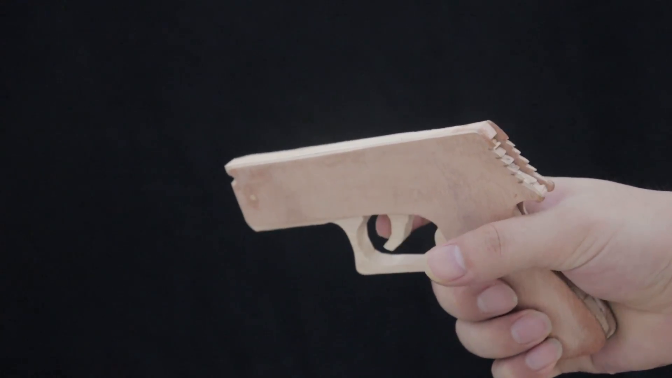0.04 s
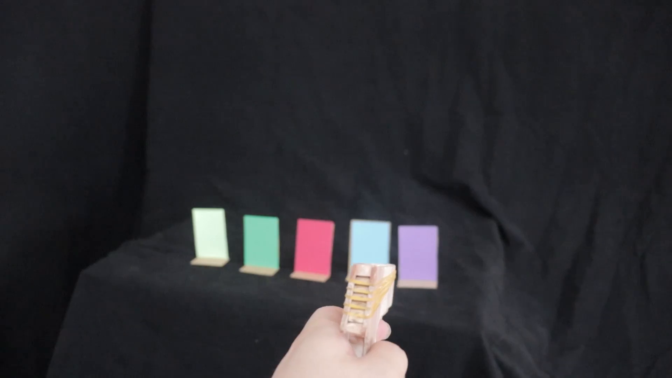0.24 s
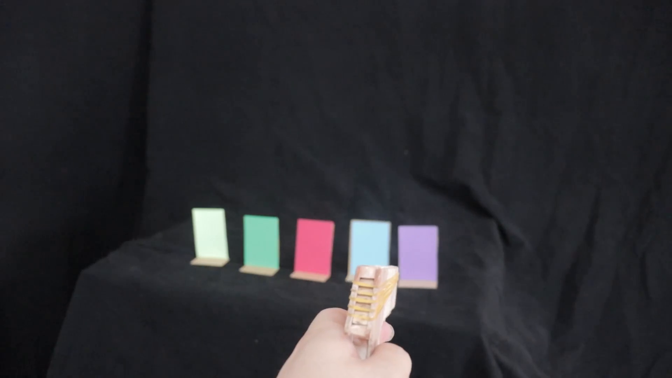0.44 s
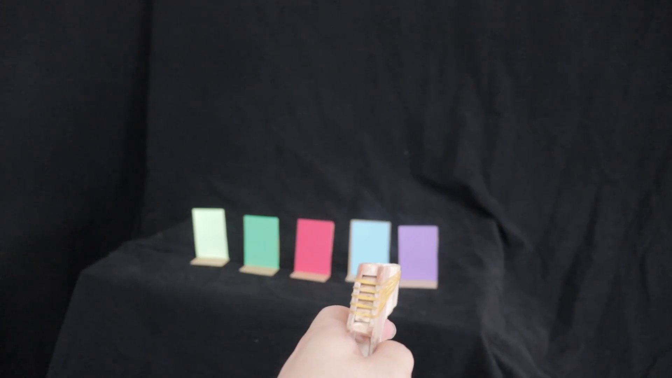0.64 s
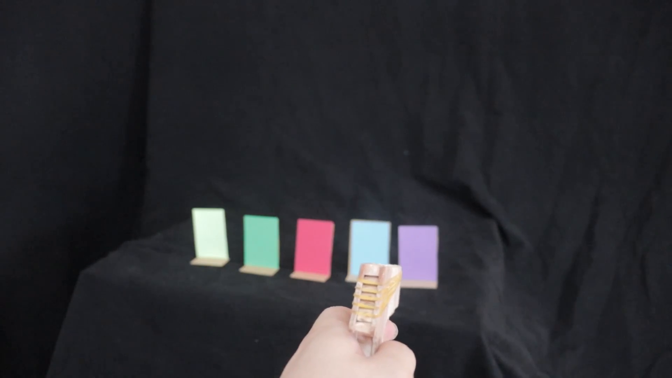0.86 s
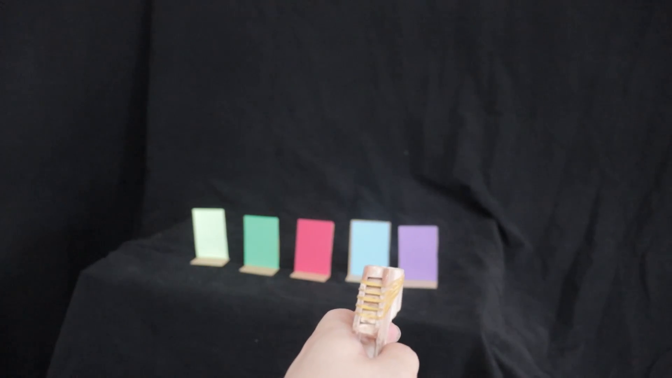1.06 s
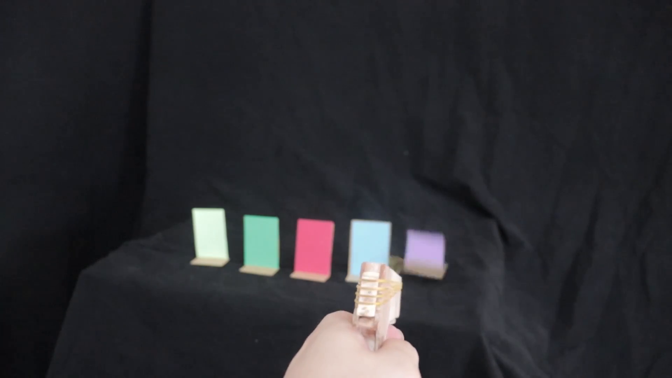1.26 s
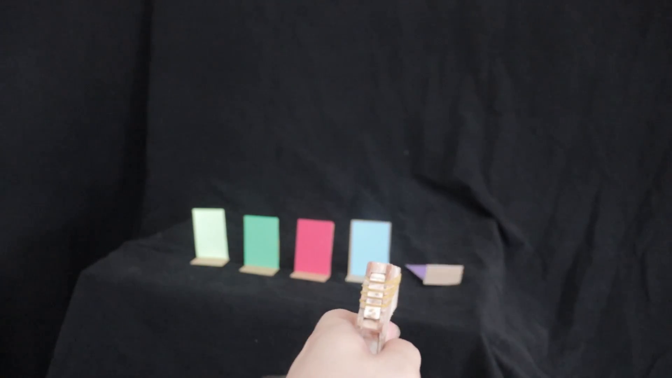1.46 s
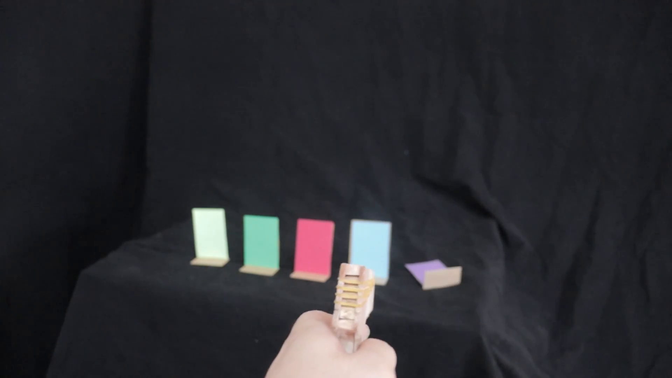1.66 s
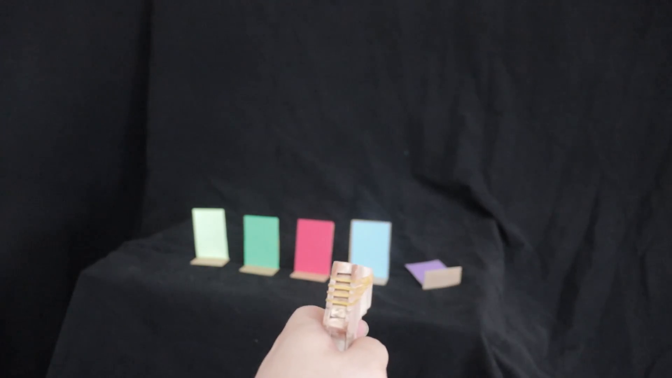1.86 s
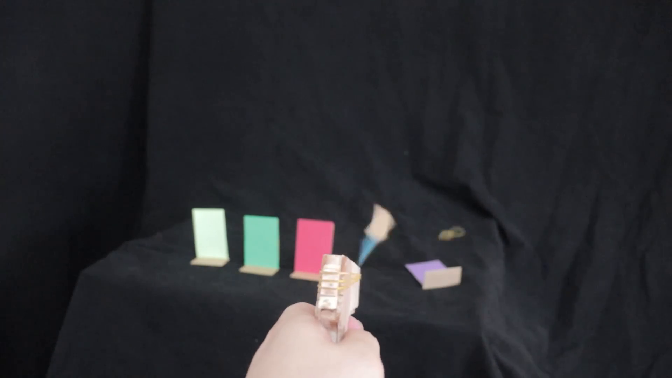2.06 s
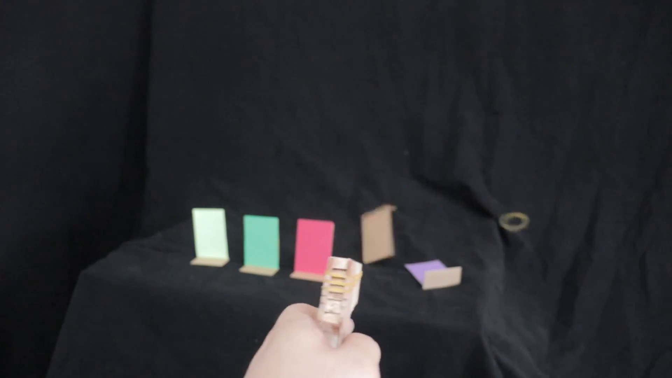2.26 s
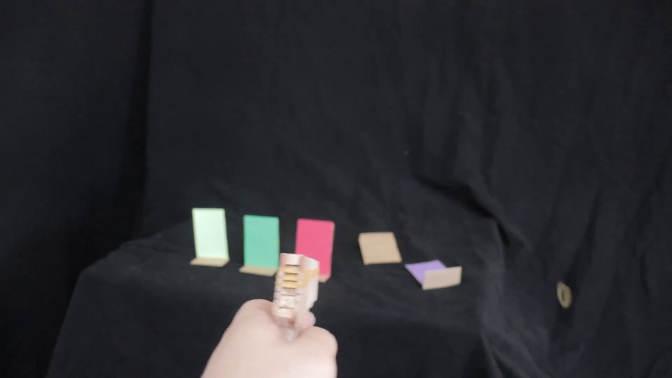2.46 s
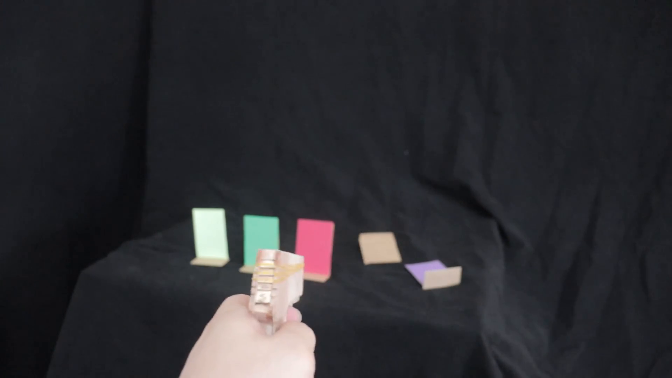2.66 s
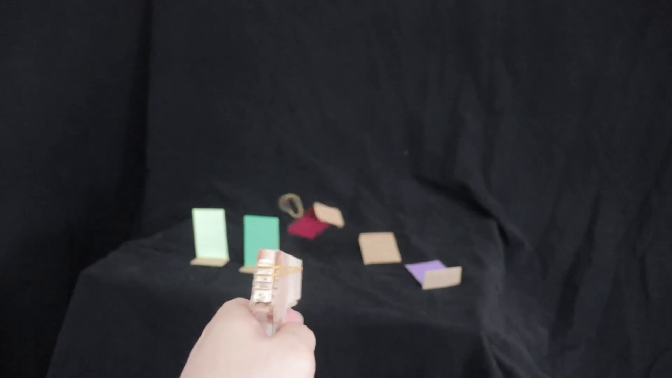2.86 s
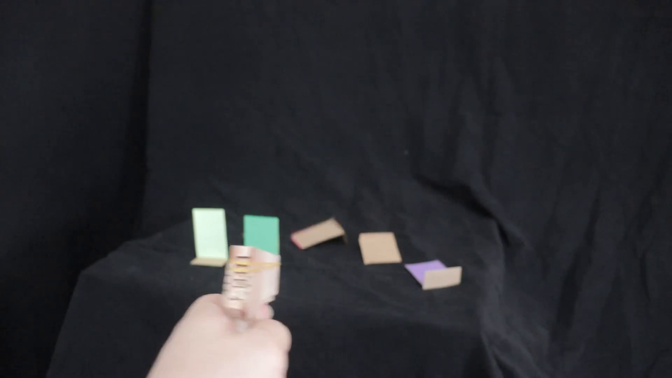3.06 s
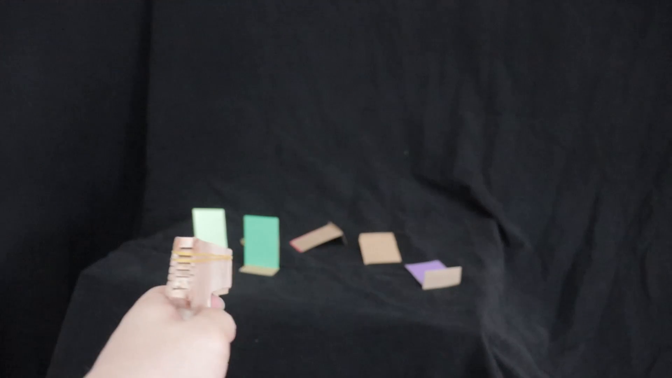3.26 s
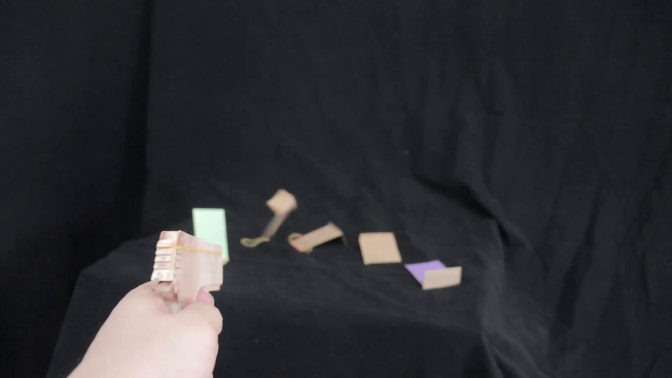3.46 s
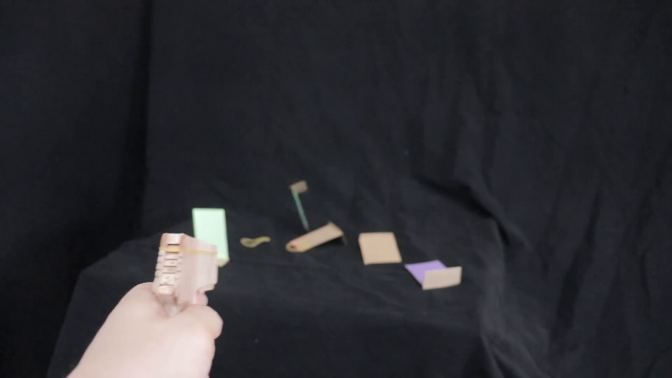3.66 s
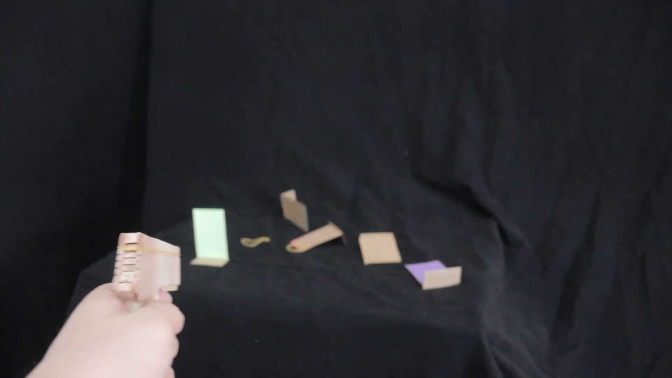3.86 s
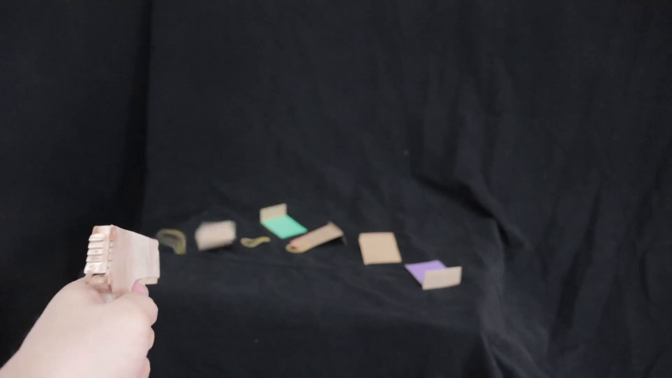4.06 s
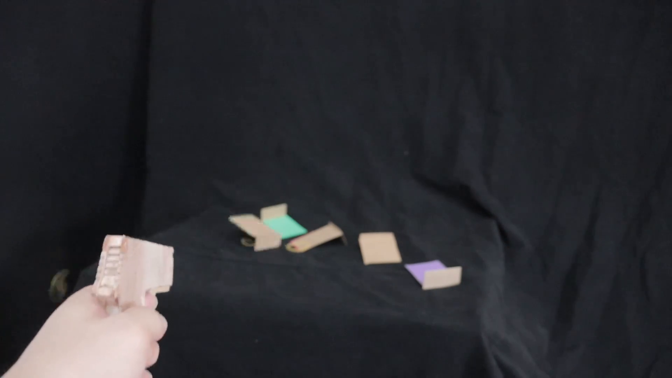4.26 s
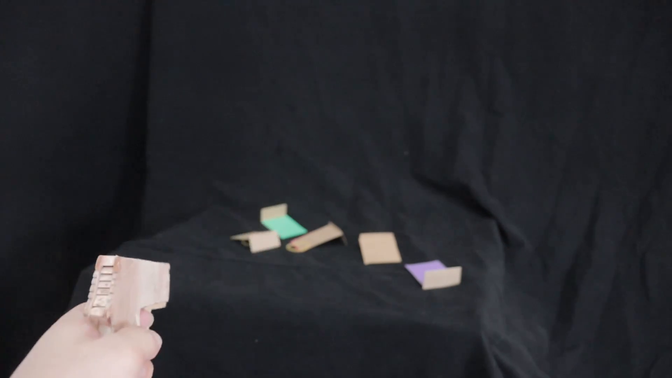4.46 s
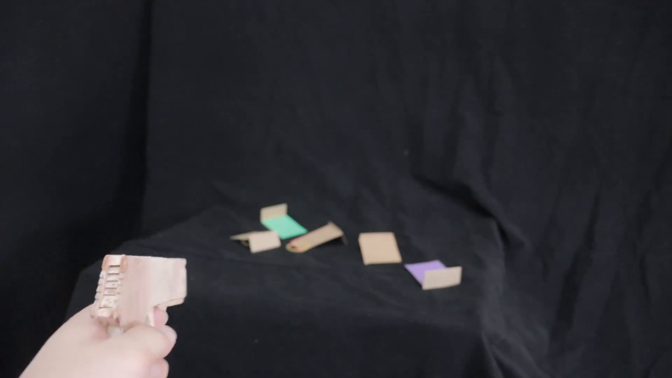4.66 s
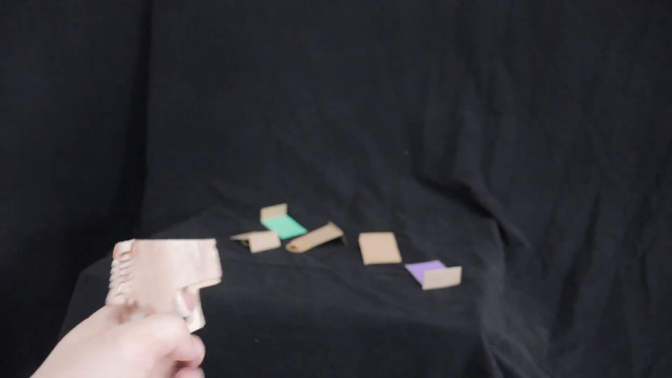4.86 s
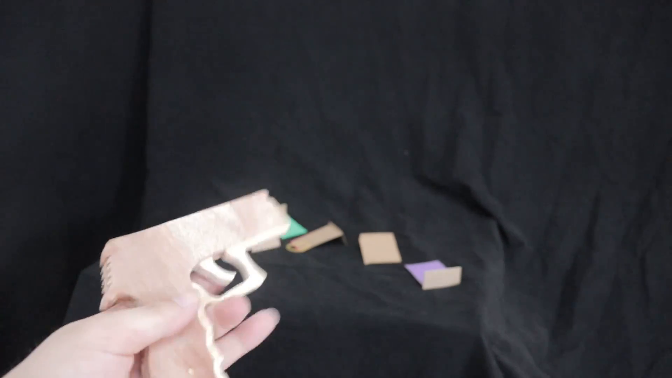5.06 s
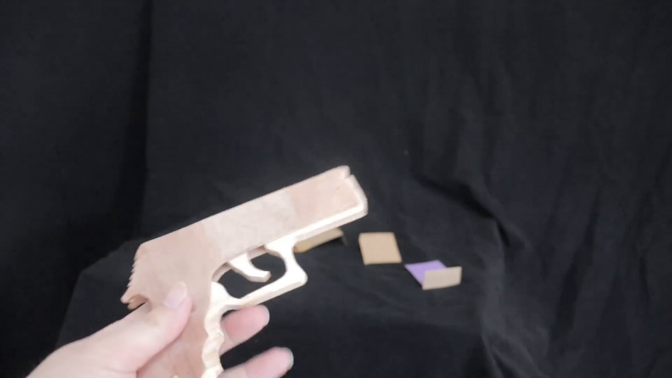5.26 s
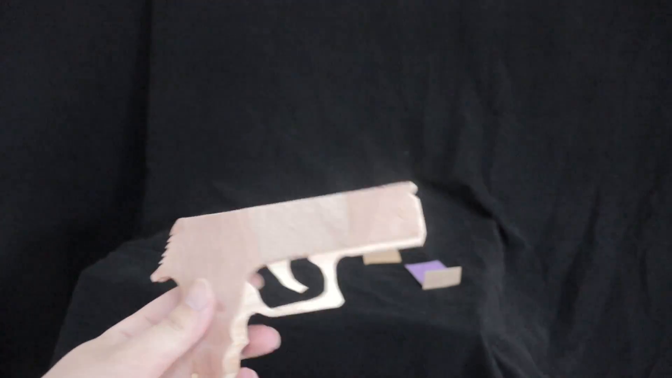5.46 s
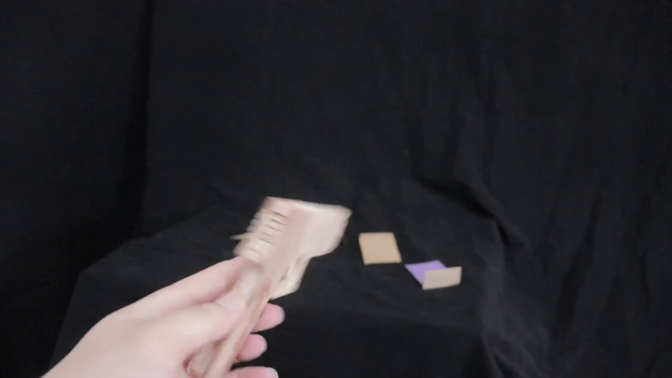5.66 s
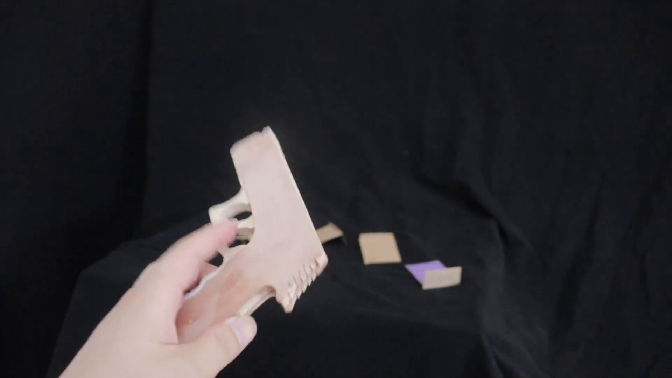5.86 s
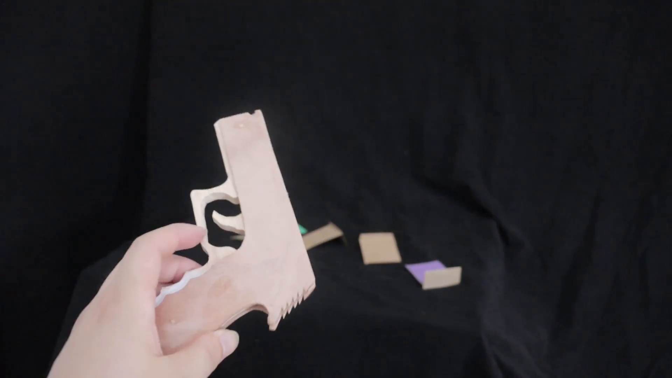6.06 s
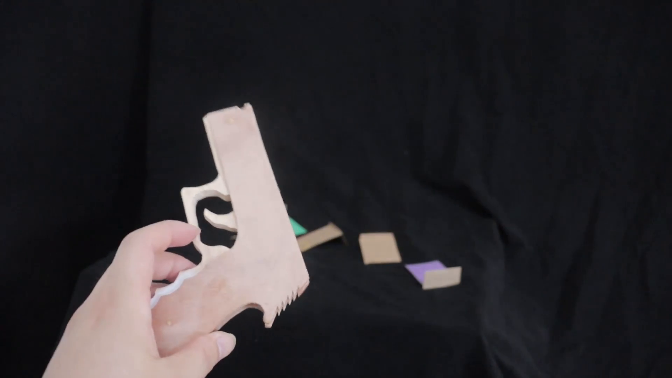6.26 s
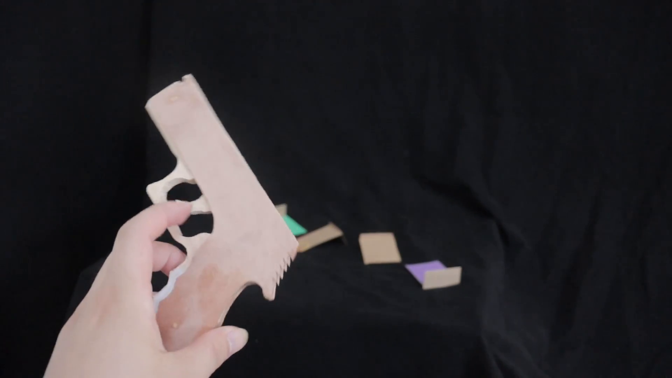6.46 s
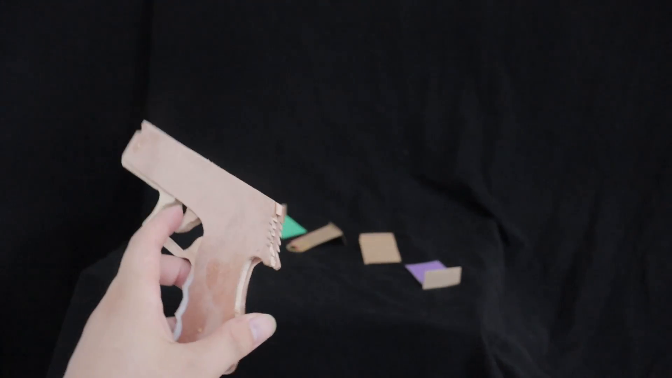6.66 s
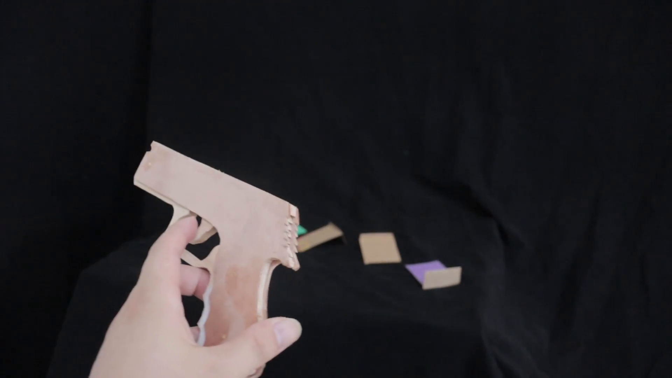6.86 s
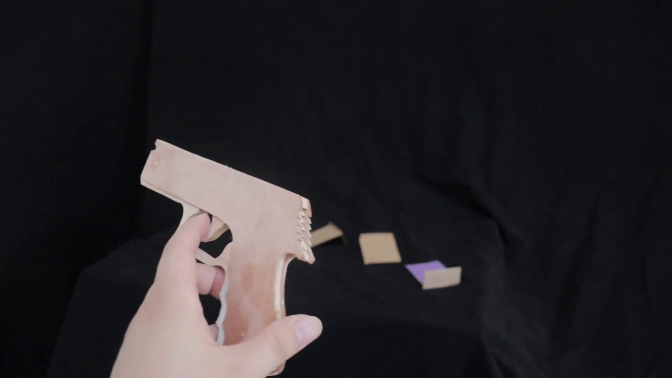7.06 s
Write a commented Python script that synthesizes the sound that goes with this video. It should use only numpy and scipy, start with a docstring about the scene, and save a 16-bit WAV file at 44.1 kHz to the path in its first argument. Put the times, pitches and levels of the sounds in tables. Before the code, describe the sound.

Close up in a fairly live room, a wooden trigger clacks once and its ring stops abruptly. After a quiet pause, five sharp rubber band cracks follow, each preceded by a tiny rising creak and tick, most with trigger clacks between. Cards tumble with dull thuds on a draped table farther off. Then soft rubs, finger taps and faint squeaks. The near stereo microphone overloads slightly on the cracks.

```python
"""A wooden rubber band pistol is fired five times at card targets in a fairly live room.
Sticking slips make the trigger creak; sharp pushes through resonances make the band crack and trigger clacks.
Cards tumble on a draped table as softened bounces; then the gun is turned in the hand: rubs, taps, squeaks.
Shaped noise and wavering tones make rumble, hiss and a fan. The cracks overload the near microphone,
whose gain ducks and recovers."""
import sys
import numpy as np
from scipy import signal
from scipy.fft import rfft, irfft
from scipy.io import wavfile
from scipy.ndimage import uniform_filter1d

SR = 44100
rng = np.random.default_rng(int(sys.argv[2]) if len(sys.argv) > 2 else 0)


def inscribe(sig):
    """Save sig as 16-bit PCM at rate SR to the path in sys.argv[1].

    A 1-D sig is mono; a 2-D sig holds one channel per row.
    Samples are clipped to [-1, 1] before scaling.
    """
    pcm = np.round(np.clip(np.atleast_2d(sig).T, -1, 1) * 32767)
    wavfile.write(sys.argv[1], SR, pcm.astype(np.int16))


N = 313536
T = np.arange(N) / SR
HIT = np.arange(2048) / SR   # time axis of one short hit


def from_db(db):
    """Decibels to gain."""
    return 10 ** (np.asarray(db) / 20)


def rms_one(x):
    """Scale to rms 1."""
    return x / np.sqrt(np.mean(x ** 2) + 1e-20)


def unit_energy(x):
    """Scale to energy 1."""
    return x / np.sqrt(np.sum(x ** 2, axis=-1, keepdims=True) + 1e-20)


def at_hz(points, hz):
    """Read a spectrum on a log-frequency axis."""
    f, value = np.transpose(points)
    return np.interp(np.log(hz + 1e-9), np.log(f), value)


def add(track, s, sound):
    """Mix a sound in from time s."""
    start = max(round(s * SR), 0)
    part = track[..., start:start + sound.shape[-1]]
    part += sound[..., :part.shape[-1]]


def cut(x, hz, kind, order=2):
    """Butterworth low- or high-pass."""
    return signal.sosfilt(signal.butter(order, hz, kind, fs=SR, output="sos"), x)


def tone(x, bass_db, treble_db, bass_hz=900, treble_hz=4500):
    """Bass shelf, then treble shelf."""
    x = x + (from_db(bass_db) - 1) * cut(x, bass_hz, "low", order=1)
    return x + (from_db(treble_db) - 1) * cut(x, treble_hz, "high", order=1)


def body(force, modes):
    """Wood or table rings as parallel two-pole resonances of alternating sign."""
    out = 0
    for k, (hz, width_hz, db) in enumerate(modes):
        r = np.exp(-np.pi * width_hz / SR)
        poles = [1, -2 * r * np.cos(2 * np.pi * hz / SR), r * r]
        ring = (1 - r * r) / 2 * signal.lfilter([1, 0, -1], poles, force)
        out = out + (-1) ** k * from_db(db) * ring
    return out


def notch(x, gaps):
    """Antiresonances: dips in series; rows are (f/Hz, width/Hz, level/dB)."""
    for hz, width_hz, db in gaps:
        x = x + (from_db(db) - 1) * body(x, [(hz, width_hz, 0)])
    return x


def contact(bounce, gap_s):
    """A sharp push, then ever weaker rebounds of the touching faces."""
    force = signal.unit_impulse(len(HIT))
    for gap in gap_s * np.array([.41, 1]) * rng.uniform(.85, 1.15, 2):
        loop = np.r_[1, np.zeros(int(gap * SR)), bounce]
        force = signal.lfilter(loop[::-1], loop, force)   # all-pass: spreads the push without colouring it
    return force


def at_level(hit, db):
    """A hit's level is that of its energy spread over 2 ms."""
    return from_db(db) * unit_energy(hit) * np.sqrt(.002 * SR)


# how alike left and right are in diffuse sound: f/Hz, correlation (0-1)
LEFT_RIGHT_LIKENESS = [(60, 0.98), (330, 0.93), (700, 0.67), (1400, 0.23), (2800, 0.052), (8000, 0.027)]


def diffuse(colour, size):
    """Stereo noise from all around: alike in the bass, nearly unrelated in the treble."""
    hz = np.fft.rfftfreq(size, 1 / SR)
    alike = np.clip(at_hz(LEFT_RIGHT_LIKENESS, hz), 0, 1)
    mid, side = rfft(rng.standard_normal((2, size)))
    stereo = np.sqrt(1 + alike) * mid + np.sqrt(1 - alike) * side * [[1], [-1]]
    return irfft(from_db(at_hz(colour, hz)) * stereo, size)


# spectrum shape of room rumble and hiss: f/Hz, relative level/dB
AIR_COLOUR = [(15, -57), (25, -20), (35, -25), (49, -8.5), (70, -1.5), (87, -13), (157, -6), (405, -11.5),
              (439, -15), (575, -15), (1480, -21), (1610, -23.5), (1740, -23.5), (2990, -29),
              (16000, -42.5)]
# tones of a fan: f/Hz, rms level/dB
FAN_HUM = [(57.5, -57), (166.9, -62), (441.4, -59.5), (500.6, -61.5), (1620, -69.5), (2945, -76)]


def background(air_db=-50, waver_hz=5.8):
    """Rumble and hiss from shaped noise, with fan tones whose pitch wavers at random."""
    out = from_db(air_db) * rms_one(diffuse(AIR_COLOUR, size=N))
    knots = np.arange(0, T[-1] + 1, 1 / 16)
    for hz, db in FAN_HUM:
        pitch = hz + waver_hz * np.interp(T, knots, rng.standard_normal(len(knots)))
        hum = np.sin(2 * np.pi * np.cumsum(pitch) / SR)
        out = out + from_db(db) * np.sqrt(2) * hum
    return out


# resonances of rubbed wood: f/Hz, width/Hz, level/dB
WOOD_GRAIN = [(1342, 620, -2.5), (2430, 840, 2), (3298, 706, 2), (4290, 1500, -5), (6260, 1016, -2),
              (9330, 6300, -6), (14600, 4800, -7.5)]


def rubbing(rows):
    """Grainy strokes that swell and fade; rows are (middle t/s, half length/s, level/dB, treble/dB)."""
    out = np.zeros(N)
    t = np.arange(-SR // 5, SR // 5) / SR
    for s, half_s, db, treble_db in rows:
        roughness = from_db(1.7 * rng.standard_normal(len(t)))
        grains = rng.standard_normal(len(t)) * roughness
        wood = rms_one(tone(body(grains, WOOD_GRAIN), 0, treble_db))
        rub = from_db(db) * wood * np.exp(-(t / half_s) ** 2)
        add(out, s + t[0], rub[t >= -s])   # drop what falls before time zero
    return out


# the hand shifts its grip on the wood: middle t/s, half length/s, level/dB, treble/dB
GRIP_RUBS = [(0.013, 0.033, -39, -6), (5.05, 0.09, -59.5, 1), (5.2, 0.021, -58, 10),
             (5.355, 0.079, -58.5, -7), (5.625, 0.041, -59.5, -8), (5.72, 0.029, -49, -10)]


def grip_rubs():
    """Skin drags across the grain as the grip shifts."""
    return rubbing(GRIP_RUBS)


def blows(rows, modes, gaps, ring_width_hz, bounce, gap_s):
    """Hard blows ring the gun; returns the direct sound and what is sent into the room."""
    out = np.zeros((2, N))
    for s, db, ring_hz, ring_db, damped_hz, damped_db, bass_db, treble_db, room_db in rows:
        wood = body(contact(bounce, gap_s), modes)
        wood = wood + body(wood, [(ring_hz, ring_width_hz, ring_db)])   # the place of the blow favours one region
        wood = notch(wood, list(gaps) + [(damped_hz, 800, damped_db)])   # the grip deadens another
        hit = at_level(tone(wood, bass_db, treble_db), db)
        add(out, s, hit * from_db([[0], [room_db]]))
    return out


# trigger and catch knock on the frame: t/s, level/dB, local ring f/Hz, ring level/dB,
# damped region f/Hz, damping/dB, bass/dB, treble/dB, room send/dB
TRIGGER_CLACKS = [(.0378, -15.5, 2160, -5, 4380, -3.5, 10.5, -0.5, -1.5),
                  (1.6186, -8.5, 4564, 0, 3840, -8.5, 6, 3, 0),
                  (2.3583, -5.5, 6500, -2.5, 5780, -5, -6, 7, -0.5),
                  (3.0285, -18, 2210, 4, 4200, -1, -14, -1.5, 2),
                  (3.6935, -15.5, 1850, -9, 3700, -1, -0.5, -3, 1.5),
                  (4.1235, -18, 2690, 3, 4710, -3.5, 5, -3.5, 2.5),
                  (4.3235, -22.5, 2220, 5.5, 4780, 0, 5, -1, 6)]
# resonances of the trigger parts: f/Hz, width/Hz, level/dB
TRIGGER_MODES = [(1705, 230, -1), (2076, 220, -1), (2610, 260, -1), (3151, 180, 3.5), (4040, 300, -6),
                 (4770, 320, -2.5), (6390, 450, -10), (7770, 770, -14), (9250, 700, -10.5),
                 (10700, 840, -13), (15000, 1100, -17.5)]


def trigger_clacks():
    """Trigger and catch strike the frame and set the small parts ringing."""
    return blows(TRIGGER_CLACKS, TRIGGER_MODES, [], ring_width_hz=450, bounce=0.72, gap_s=0.00049)


# decay of the room: f/Hz, time to fall 60 dB/s
ROOM_DECAY = [(100, 1), (230, 1.07), (500, .65), (1000, 0.7), (2500, 0.66), (5000, 0.65), (9000, 0.52),
              (16000, 0.6)]
# colour of echoes and tail: f/Hz, relative level/dB
TAIL_COLOUR = [(60, 1.5), (130, 2), (200, 4), (400, 1), (800, 2), (1500, -2), (3000, -2.5), (6000, 1.5),
               (10000, -3.5), (16000, -6.5)]
# low standing waves: f/Hz, time to fall 60 dB/s, level/dB
STANDING_WAVES = [(169, 1.5, -54), (193.8, 0.97, -51), (224.7, 1.4, -49.5), (242.2, 1.55, -54.5),
                  (336, 0.69, -56.5)]
# echoes off near surfaces: delay t/s, level/dB
NEAR_ECHOES = [(.0028, -10.5), (0.013, -12), (0.0172, -14.5), (0.022, -14.5)]


def room_response(tail_db=-1.0, build_s=0.0043, scatter_s=0.00071):
    """Smeared early echoes, a diffuse tail dying band by band, and low standing waves."""
    t = T[:65536]
    hz = np.fft.rfftfreq(len(t), 1 / SR)
    noise = rfft(diffuse(TAIL_COLOUR, size=len(t)))
    centres = np.array(ROOM_DECAY)[:, 0]
    out = np.zeros((2, len(t)))
    for share, (_, t60) in zip(np.eye(len(centres)), ROOM_DECAY):
        band = irfft(noise * at_hz(np.c_[centres, share], hz))
        even_energy = np.sqrt(np.log(1000) / (t60 * SR))   # long decays start lower
        out += band * from_db(-60 * t / t60) * even_energy
    out *= from_db(tail_db) * (1 - np.exp(-(t / build_s) ** 2))
    for delay_s, db in NEAR_ECHOES:
        smear = diffuse(TAIL_COLOUR, size=len(HIT)) * np.exp(-HIT / scatter_s)
        add(out, delay_s, from_db(db) * unit_energy(smear))
    for mode_hz, t60, db in STANDING_WAVES:
        wave = np.sin(2 * np.pi * (mode_hz * t + rng.random()))
        out += from_db(db) * wave * np.exp(-np.log(1000) * t / t60)
    return out


def near_field(x, side_db, spread_s):
    """Hand and microphone body scatter sound differently into each side; the left is reached first."""
    burst = rng.standard_normal(len(HIT)) * np.exp(-HIT / spread_s)
    scatter = from_db(side_db) * unit_energy(cut(burst, 900, "high", order=1))
    side = signal.oaconvolve(x, scatter)[:N]
    return np.array([x + side, np.roll(x - side, 1)])   # right is one sample late


# fingers tap the frame: t/s, level/dB, local ring f/Hz, ring level/dB, bass/dB, treble/dB
FINGER_TAPS = [(1.189, -44, 3200, 8, -10, 3), (5.064, -48, 1080, 14, 11, -7), (5.087, -43, 1220, 9, 2, 12),
               (5.2468, -34.5, 820, 12.5, 3.5, 8.5), (5.901, -50.5, 2140, 13, -6, -13)]
# resonances of the frame, for taps and cracks: f/Hz, width/Hz, level/dB
FRAME_MODES = [(91.8, 50, -16.5), (340, 284, -12), (810, 130, -5), (1233, 220, -2), (1628, 174, 1.5),
               (1874, 140, 1), (2198, 290, -0.5), (2847, 257.2, 0), (3264, 267, -2), (3780, 670, -4.5),
               (5375, 770, -9), (6680, 1520, -11), (8800, 3500, -13.5), (14120, 4300, -17)]


def taps(ring_width_hz=230):
    """Light touches of the fingers ring the frame."""
    out = np.zeros(N)
    for s, db, ring_hz, ring_db, bass_db, treble_db in FINGER_TAPS:
        wood = body(contact(bounce=0.77, gap_s=0.00025), FRAME_MODES)
        wood = wood + body(wood, [(ring_hz, ring_width_hz, ring_db)])
        add(out, s, at_level(tone(wood, bass_db, treble_db), db))
    return out


def slip(db, treble_db):
    """One slip of wood on wood, catching another spot of the wood with a ring of its own."""
    wood = body(contact(bounce=0.85, gap_s=.0002), WOOD_GRAIN)
    ring_hz = 3405 * np.exp(0.4 * rng.standard_normal())
    wood = wood + body(wood, [(ring_hz, 500, 2)])
    return at_level(tone(wood, 0, treble_db), db)


def slip_run(length_s, db, treble_db, end_lead_s=.0155, rise_db_per_s=219, count=16):
    """Stick-slip grows with the force until just before the shot: pairs (lead before it/s, sound)."""
    gaps = 0.0054 * np.exp(.35 * rng.standard_normal(count))   # uneven, around 5.4 ms
    leads = length_s - (np.cumsum(gaps) - gaps[0])
    levels = db + 3 * rng.standard_normal(count) - rise_db_per_s * (leads - end_lead_s)
    levels[0] += 2.5   # the breakaway slip is stronger
    slips = [slip(level_db, treble_db) for level_db in levels]
    return [(lead_s, sound) for lead_s, sound in zip(leads, slips) if lead_s > end_lead_s]


# the pull before each shot: take-up lead/s, take-up level/dB, creak start lead/s, creak level/dB,
# creak treble/dB, catch level/dB, band slide level/dB
TRIGGER_PULLS = [(.1, -48.5, .0665, -28, 1, -20.5, -28.5), (0.068, -45, 0.034, -28, 1, -19.5, -37.5),
                 (0.053, -47.5, 0.024, -26.5, -1, -33, -29.5), (.064, -48, .03, -30.5, -1, -24.5, -37.5),
                 (0.056, -46.5, .0245, -30.5, 5, -21.5, -26)]


def trigger_pulls():
    """The finger takes up slack, the trigger sticks and slips, the catch snaps free, the band slides off."""
    out = np.zeros(N)
    for (s, *_), pull in zip(BAND_SHOTS, TRIGGER_PULLS):
        take_up_s, take_up_db, creak_s, creak_db, treble_db, catch_db, slide_db = pull
        for lead_s, sound in slip_run(creak_s, creak_db, treble_db):
            add(out, s - lead_s, sound)
        add(out, s - 0.023, slip(catch_db, treble_db=6.5))   # bright tick
        take_up = (s - take_up_s, .018, take_up_db, -4)   # soft rub
        slide = (s - .008, 0.0095, slide_db, -12)   # dull rub off the tooth
        out += rubbing([take_up, slide])
    return out


# the band lets go: t/s, level/dB, ring of this stretch f/Hz, ring level/dB,
# damped region f/Hz, damping/dB, bass/dB, treble/dB, room send/dB
BAND_SHOTS = [(1.3270, 0.5, 4076, -1.5, 2858, -8.5, 5, 5, -1),
              (2.0962, -2, 1170, -6.5, 4600, -3, 1.5, -2, 0),
              (2.8267, -1, 2900, -5.5, 1100, -1.5, 2.5, 0, 0.5),
              (3.4778, -3, 2570, -4.5, 2080, -5.5, 0, 2.5, 0),
              (4.1261, 2, 2700, -5.5, 1450, -1.5, -5.5, -4.5, 0.5)]
# antiresonances between the frame modes: f/Hz, width/Hz, level/dB
FRAME_DIPS = [(173, 70, -3.5), (584, 81, -2.5), (928, 200, -3), (1520, 140, -4.5), (2050, 160, -7.5),
              (3560, 180, -1), (11000, 2500, -2)]


def band_cracks():
    """The freed band slaps the frame, which rings between its antiresonances."""
    return blows(BAND_SHOTS, FRAME_MODES, FRAME_DIPS, ring_width_hz=320, bounce=0.85, gap_s=.00045)


# a card or band lands on the cloth: t/s, level before distance/dB, softness cut-off f/Hz,
# first bounce/s, loss per bounce/dB
CARD_FALLS = [(1.395, -22, 353, 0.082, 6.5), (2.16, -26, 302, 0.042, 15), (2.468, -19, 1600, .013, 3.5),
              (2.871, -22, 401.4, 0.056, 11.5), (3.065, -17.5, 1130, .025, 2.5),
              (3.52, -17.5, 420.5, 0.033, 10.5), (3.641, -17, 650, .02, 10), (3.705, -20, 197, 0.032, 8.5),
              (3.883, -19.5, 1030, .025, 9), (4.284, -19.5, 566, .021, 3.5), (4.453, -26, 483, 0.035, 15)]
# resonances of the table top: f/Hz, width/Hz, level/dB
TABLE_MODES = [(110.6, 8.8, -11.5), (190, 55, -6.5), (266, 75, -4), (340, 97, -1), (433, 90, 1),
               (565.5, 260, -2), (834, 730, -3), (1270, 580, -3), (1990, 1300, -15.5)]


def cards(count=3):
    """Ever shorter, weaker bounces: the cloth dulls each blow and the table top booms."""
    out = np.zeros(N)
    for s, db, soft_hz, bounce_s, loss_db in CARD_FALLS:
        for k in range(count):
            force = cut(contact(bounce=0.84, gap_s=0.0025), soft_hz, "low")
            add(out, s, at_level(body(force, TABLE_MODES), db - k * loss_db))
            s += bounce_s * .85 ** k   # each bounce lasts 85 % of the one before
    return out


# skin squeaks faintly on the wood: middle t/s, half length/s, f/Hz, glide/(Hz per s), level/dB
SKIN_SQUEAKS = [(5.869, 0.077, 868, 54, -56), (5.961, 0.053, 1117, 678, -59)]


def squeaks(flutter=0.45, waver_hz=13):
    """Short tones of unsteady pitch and loudness that swell and fade."""
    out = np.zeros(N)
    t = np.arange(-SR // 6, SR // 6) / SR
    for s, half_s, hz, glide, db in SKIN_SQUEAKS:
        grip, waver = rms_one(cut(rng.standard_normal((2, len(t))), 43, "low"))
        squeak = np.sin(2 * np.pi * np.cumsum(hz + glide * t + waver_hz * waver) / SR)
        swell = (1 + flutter * grip) * np.exp(-(t / half_s) ** 2)
        add(out, s + t[0], from_db(db) * squeak * swell)
    return out


def scene():
    """The gun is near and the table far; both sound in one room."""
    friction = cut(trigger_pulls() + grip_rubs(), 1200, "high")
    handling = friction + taps() + squeaks()
    direct, sent = band_cracks() + trigger_clacks() + handling * from_db([[0], [-1.5]])
    table = cards()
    room_feed = sent + from_db(-3.0) * table
    room = signal.fftconvolve(room_feed[None], room_response(), axes=1)[:, :N]
    sound = near_field(direct + from_db(-5.5) * table, side_db=-4.0, spread_s=0.0021) + room
    # the ring of the first clack stops abruptly, leaving only the background for a moment
    sound = sound * np.interp(T, [.185, .195, .33, .335], [1, 0, 0, 1])
    return (sound + background()) * from_db([[0.44], [-0.44]])   # slightly louder on the left


def record(dry, threshold_db=-7.0, release_db_per_s=65, attack_s=0.0017, top=0.69):
    """Gain control ducks above a threshold and recovers; peaks it misses overload; the top is cut."""
    power = np.abs(uniform_filter1d(np.mean(dry ** 2, axis=0), size=48))
    over_db = np.maximum(10 * np.log10(power + 1e-12) - threshold_db, 0)
    released_db = release_db_per_s * T
    held_db = np.maximum.accumulate(over_db + released_db) - released_db
    r = np.exp(-1 / (attack_s * SR))
    duck_db = signal.lfilter([1 - r], [1, -r], held_db)
    overloaded = np.clip(dry * from_db(-duck_db), -top, top)
    top_cut = signal.ellip(10, .1, 80, 16000, fs=SR, output="sos")   # steep low-pass at 16 kHz
    return signal.sosfilt(top_cut, overloaded)


dry = scene()
out = record(dry)
inscribe(out)
```